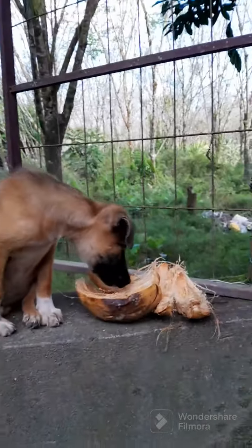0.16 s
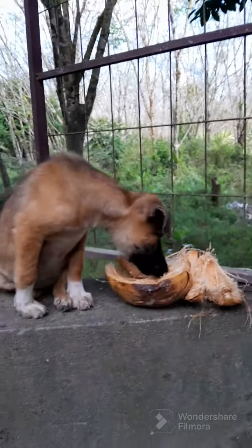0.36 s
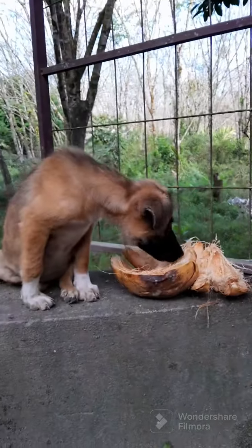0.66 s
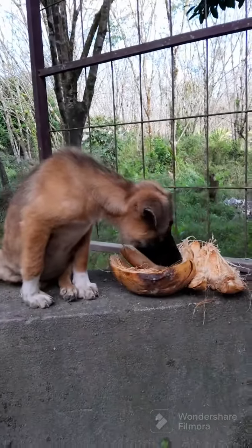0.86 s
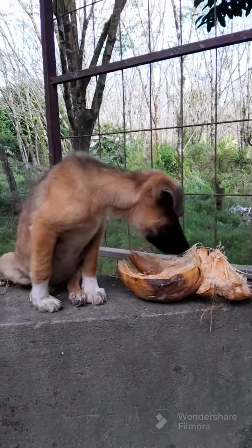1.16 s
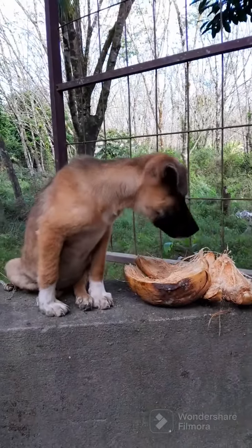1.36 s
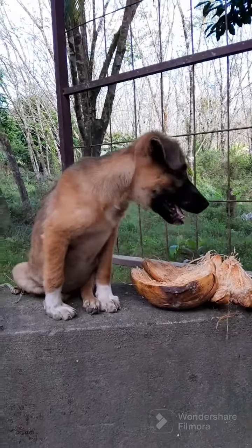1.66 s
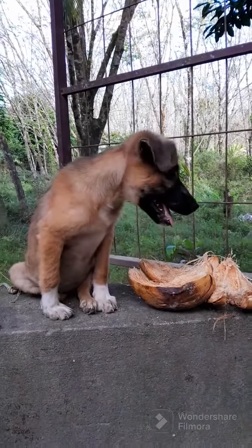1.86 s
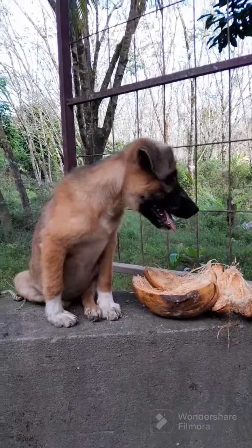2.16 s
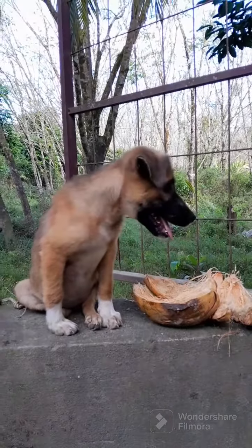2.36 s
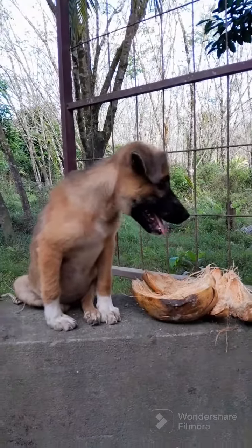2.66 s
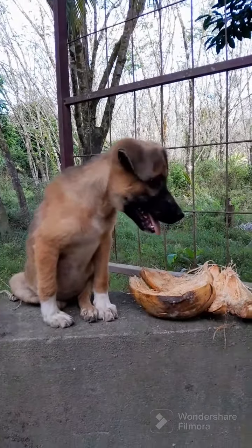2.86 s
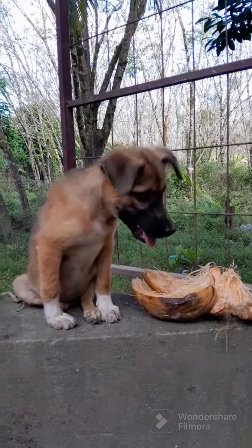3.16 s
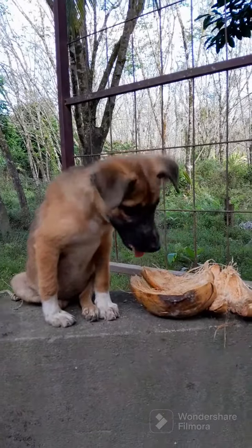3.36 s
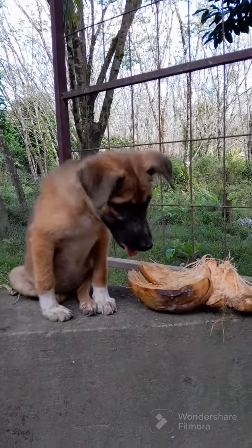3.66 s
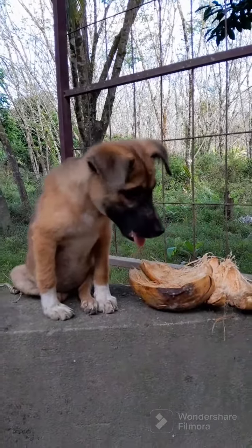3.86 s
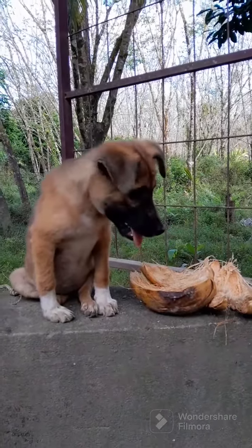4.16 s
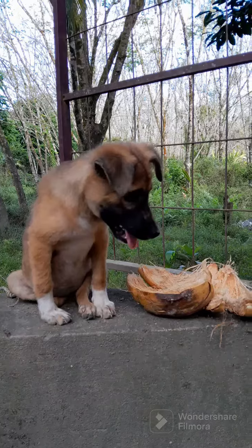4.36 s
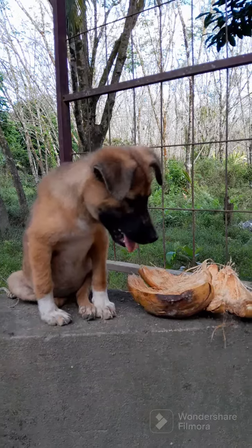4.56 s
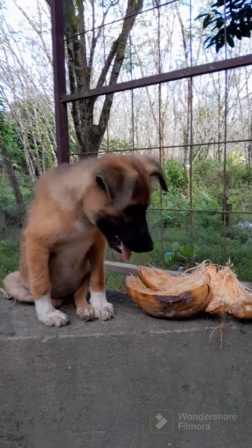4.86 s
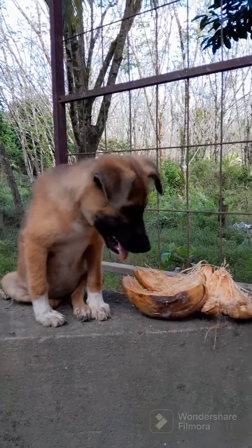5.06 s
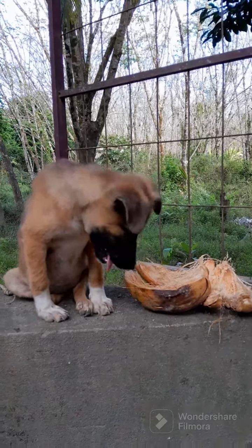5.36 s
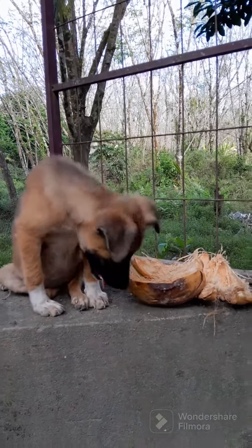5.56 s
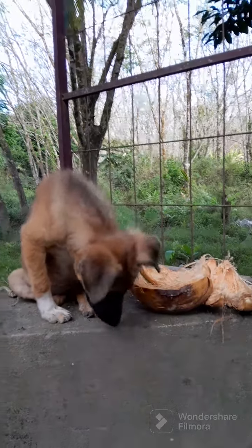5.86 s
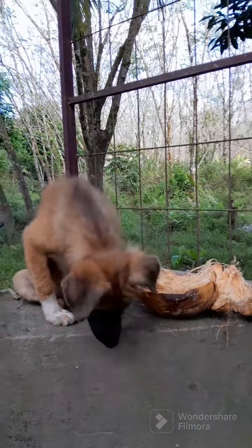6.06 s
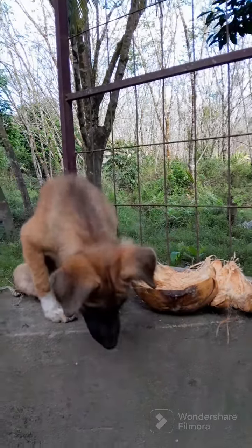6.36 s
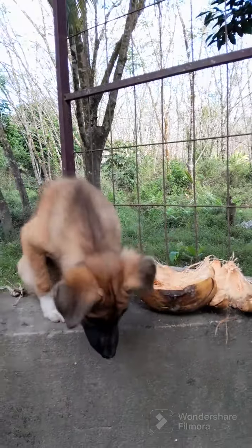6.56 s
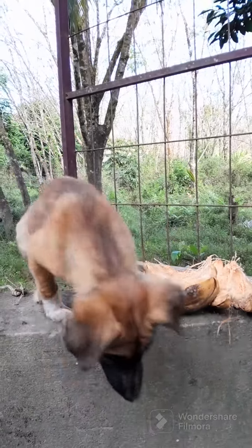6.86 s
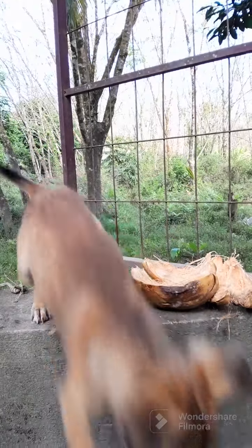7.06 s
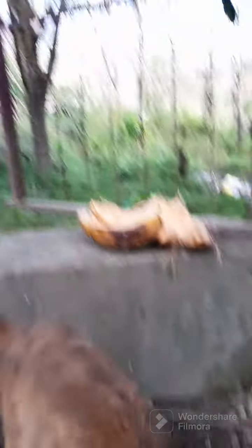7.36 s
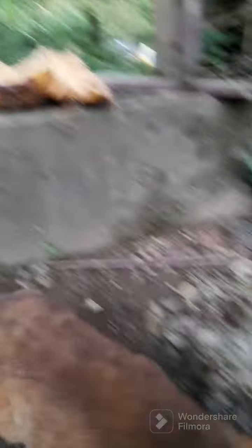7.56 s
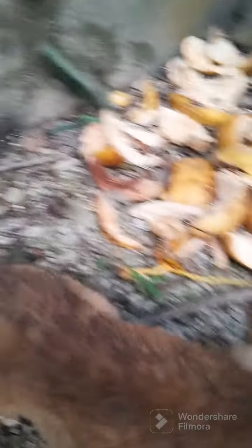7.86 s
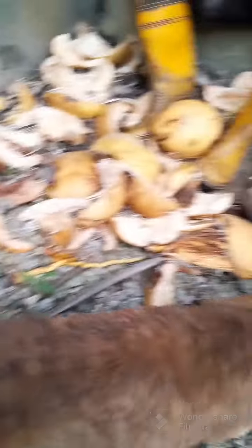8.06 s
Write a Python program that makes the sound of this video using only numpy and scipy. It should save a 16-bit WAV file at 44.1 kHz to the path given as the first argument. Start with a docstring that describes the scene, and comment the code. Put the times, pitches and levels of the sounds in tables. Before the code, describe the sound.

Close, dry contact noises over a quiet open-air bed: thin hiss, faint insects, low rumble and a distant motor hum. Small birds give rising whistles and hoarse chips with a scattered woodland tail. Brushes and knocks rattle the microphone case in separate bursts, with a lull after the middle. At the end a puppy hops down, snapping grit, and rustles past slightly to the right.

```python
"""Puppy and coconut husk at the edge of a wood

A puppy noses a coconut husk on a concrete ledge, then hops down and rustles past over gravel.
Close by, things brush, rub and knock on the hand-held microphone: shaped noise, squeaks and dying low cycles.
Small birds whistle and chip in the trees: gliding tones with rasp and a scattered tail.
Far off an engine hums in a few partials; insects hiss, a whine drifts, and air puffs on the ports."""
import sys
import numpy as np
from scipy import signal
from scipy.fft import rfft, irfft, next_fast_len
from scipy.io import wavfile
from scipy.ndimage import uniform_filter1d

SR = 44100
rng = np.random.default_rng(int(sys.argv[2]) if len(sys.argv) > 2 else 0)


def materialize(psi):
    """Save the field psi as 16-bit PCM at rate SR to the path in sys.argv[1].

    A 1-D psi becomes a single channel; in a 2-D psi each row is a channel.
    """
    bounded = np.clip(np.atleast_2d(psi).T, -1, 1)
    quanta = np.round(bounded * 32767).astype(np.int16)
    wavfile.write(sys.argv[1], SR, quanta)


N = 362061
TIME = np.arange(N) / SR
PASSING_START_S = 7.47  # the puppy lands and starts to pass

# Spectrum of the friction hiss. Each row: frequency in Hz, level in dB per Hz.
HISS_SPECTRUM = [(200, -15), (900, -7), (1600, -5), (2500, -2), (4000, 0), (6000, -2), (8200, 2.5),
                 (11000, -0.5), (15500, -2.5)]
# Spectrum of the far rumble, also used for the rattle of thuds. Each row: frequency in Hz, level in dB per Hz.
RUMBLE_SPECTRUM = [(40, -13.5), (80, 4), (150, -7), (220, -12.5), (350, -15.5), (700, -28.5), (1500, -34),
                   (4000, -37.5)]


def from_db(db):
    """Decibels to gain."""
    return 10 ** (np.asarray(db) / 20)


def rms_one(x):
    """Scale to unit power."""
    return x / np.sqrt(np.mean(x ** 2) + 1e-20)


def in_time(rows, t=TIME):
    """The columns of a curve, joined by straight lines."""
    s, *columns = np.transpose(rows)
    return [np.interp(t, s, c) for c in columns]


def drift(rate, size=N):
    """Random wander of spread about 1, with rate new random points a second joined by lines."""
    steps = np.arange(size) * rate / SR
    return np.interp(steps, np.arange(N // 20), rng.standard_normal(N // 20))


def colour(x, spectrum):
    """Give a noise a smooth spectrum, with nothing below 15 Hz; rms 1."""
    hz, db = np.transpose(spectrum)
    size = next_fast_len(x.shape[-1])
    bins = np.maximum(np.arange(size // 2 + 1) * SR / size, 1)
    gain = from_db(np.interp(np.log(bins), np.log(hz), db)) * (bins > 15)
    shaped = irfft(rfft(x, size) * gain, size)
    return rms_one(shaped[..., :x.shape[-1]])


def resonate(x, hz, width_hz):
    """A two-pole resonance."""
    r = np.exp(-np.pi * width_hz / SR)
    return signal.lfilter([1 - r, 0, r - 1], [1, -2 * r * np.cos(2 * np.pi * hz / SR), r * r], x)


def pair(alike, size=N):
    """White noise at the two ports; alike is the share of power they have in common."""
    alike = np.clip(alike, 0, 1)
    shared = np.sqrt(alike) * rng.standard_normal(size)
    return shared + np.sqrt(1 - alike) * rng.standard_normal((2, size))


def place(x, pan_db, lag_per_db=5.5):
    """The nearer port hears a sound louder and up to 20 samples earlier; positive pan is left."""
    lag = round(float(np.clip(-pan_db * lag_per_db, -20, 20)))
    late = [np.pad(side, (max(d, 0), 0))[:len(side)] for side, d in zip(x, (lag, -lag))]
    return np.array(late) * from_db([[pan_db / 2], [-pan_db / 2]])


def beside(x, s):
    """Place a near contact on the side where things are happening at that time."""
    # Each row: time in seconds, left level over right in dB.
    contact_side = [(1.3, 3), (3.4, -1), (4.3, -1), (6.9, 1.5), (7.3, -3.5), (8.2, -4.5)]
    return place(x, in_time(contact_side, s)[0])


def add(out, s, x):
    """Mix a short sound in at a given time."""
    at = round(s * SR)
    first, last = max(at, 0), min(at + x.shape[-1], N)
    out[:, first:last] += x[:, first - at:last - at]


def friction(size, alike, catch_db, grain_db):
    """Surfaces catch and slip unevenly, and each slip is a shower of tiny grains."""
    uneven_db = catch_db * drift(170, size) + grain_db * drift(1800, size)
    return pair(alike, size) * from_db(uneven_db)


def stroke(s, rise, fall, drone_db, hiss_db, hz, squeak_db, squeak_q=3.3, edge_db=-20, squeak_grip=1.52):
    """A stroke swells and fades: a hiss, the case's drone and a squeak that needs firm pressure."""
    # Spectrum of the case's drone. Each row: frequency in Hz, level in dB per Hz.
    drone_spectrum = [(150, 2.5), (300, -3.5), (420, -10), (590, 1.5), (800, -4), (1050, -4), (1500, -5),
                      (2200, -12), (3400, -11), (6000, -13.5), (16000, -59)]
    t = np.arange(-SR // 2, SR // 2) / SR
    # edge_db is reached one rise before and one fall after the loudest moment
    pressure = from_db(edge_db * np.where(t < 0, (t / rise) ** 2, np.abs(t / fall)))
    case_slips = friction(len(t), alike=0.61, catch_db=3.5, grain_db=0.0)
    drone = from_db(drone_db) * colour(case_slips, drone_spectrum)
    hiss_slips = friction(len(t), alike=0.23, catch_db=3.0, grain_db=2.3)
    hiss = from_db(hiss_db) * colour(hiss_slips, HISS_SPECTRUM)
    squeak_slips = friction(len(t), alike=0.68, catch_db=3.0, grain_db=0.5)
    width = hz / squeak_q
    squeak = from_db(squeak_db) * rms_one(resonate(resonate(squeak_slips, hz, width), hz, width))
    return beside(pressure * (drone + hiss) + pressure ** squeak_grip * squeak, s)


def brushes(squeak_hz=2180, squeak_db=-15, drone_db=-13.5):
    """Light brushes of fur and fibre mostly hiss; squeak and drone are set relative to that hiss."""
    # Each row: loudest moment, rise and fall in seconds, hiss level in dB.
    light_touches = [(.785, 0.014, 0.21, -44), (.826, 0.0083, 0.12, -43.5), (1.015, 0.0076, 0.073, -56.5),
                     (1.168, 0.0074, 0.036, -54), (1.197, 0.04, 0.13, -45), (1.283, 0.0045, 0.078, -48),
                     (6.935, 0.006, 0.14, -54), (7.252, 0.026, 0.025, -43.5), (7.39, 0.053, 0.14, -66)]
    out = np.zeros((2, N))
    for s, rise, fall, db in light_touches:
        touch = stroke(s, rise, fall, db + drone_db, db, squeak_hz, db + squeak_db)
        add(out, s - .5, touch)
    return out


def rubs():
    """A firm rub makes the microphone case drone and squeak."""
    # Each row: loudest moment, rise and fall in seconds, drone and hiss levels in dB,
    # squeak pitch in Hz, squeak level in dB.
    firm_touches = [ (.832, 0.0076, 0.0084, -39, -55, 2570, -42.5),
                    (.850, 0.036, 0.083, -48, -55, 2080, -49.5), (.9, 0.048, 0.21, -64.5, -56, 2170, -64),
                    (2.785, 0.048, 0.12, -67, -67.5, 740, -71), (3.27, 0.21, .24, -69, -63.5, 2480, -80),
                    (3.386, 0.04, 0.12, -47.5, -51, 2440, -43),
                    (3.409, 0.028, 0.027, -46, -46, 1830, -43.5),
                    (3.488, 0.047, 0.12, -58, -62.5, 2320, -55),
                    (4.0215, 0.0021, 0.049, -44, -58, 1310, -41.5),
                    (4.037, .012, .046, -36, -47, 1410, -37), (4.084, 0.0044, 0.033, -40.5, -65, 990, -44),
                    (4.099, .0044, 0.083, -50, -56, 1460, -51.5),
                    (4.257, 0.023, 0.048, -54.5, -59, 710, -52),
                    (4.274, 0.0068, .06, -47.5, -59, 1400, -48), (4.314, 0.029, .12, -52, -56, 635, -54.5),
                    (6.134, .004, 0.029, -67.5, -80, 1366, -70), (6.52, .13, 0.35, -60.5, -61.5, 1020, -70),
                    (6.752, .004, 0.076, -54.5, -63, 1250, -58.5),
                    (6.791, .004, 0.12, -57.5, -69, 1220, -58), (7.303, 0.031, 0.035, -40, -47, 1460, -42),
                    (7.31, 0.015, 0.043, -42.5, -57, 580, -39)]
    out = np.zeros((2, N))
    for s, *shape in firm_touches:
        add(out, s - .5, stroke(s, *shape))
    return out


def steps(ring_hz=2700, ring_db=-12, drone_db=-21):
    """Paws land and skid on gravel, which hisses and rings; ring and drone are relative to the hiss."""
    # Each row: loudest moment, rise and fall in seconds, hiss level in dB.
    paws = [(7.470, 0.0049, 0.06, -31), (7.496, 0.022, 0.016, -34.5), (7.551, .006, 0.063, -45.5),
            (7.658, 0.03, 0.073, -40), (7.778, 0.0068, 0.027, -32.5), (7.924, 0.012, .04, -47.5),
            (8.044, 0.0057, 0.055, -53.5), (8.196, 0.012, 0.033, -44.5)]
    out = np.zeros((2, N))
    for s, rise, fall, db in paws:
        add(out, s - .5, stroke(s, rise, fall, db + drone_db, db, ring_hz, db + ring_db))
    return out


def passing(start_db=-57.5, growth_db_per_s=8, attack_s=.02, crunch_db=-6, crunch_db_per_s=6,
            crunches_per_s=900, ring_q=8, size_db=0.5, uneven_db=3.0, clump_db=4.5, clumps_per_s=28):
    """Grainy rustle grows as the puppy nears; small stones knock in clumps, each at its own pitch."""
    # Spectrum of the rustle. Each row: frequency in Hz, level in dB per Hz.
    rustle_spectrum = [(100, -3), (200, 6), (400, 1.5), (650, -7.5), (1000, -9), (1400, -5), (2500, -6),
                       (5000, -5), (9000, -9.5), (15500, -11.5)]
    t = np.arange(N - round(PASSING_START_S * SR)) / SR
    level_db = start_db + growth_db_per_s * t + uneven_db * drift(28.1, len(t))
    level = from_db(level_db) * np.minimum(t / attack_s, 1)
    grains = colour(friction(len(t), alike=0.15, catch_db=3.0, grain_db=2.0), rustle_spectrum)
    pitches = np.geomspace(620, 2400, num=14)
    clumps = clump_db * drift(clumps_per_s, len(t))
    stones = 0
    for hz in pitches:
        hits = rng.random(len(t)) < crunches_per_s / len(pitches) / SR
        strikes = hits * from_db(clumps + size_db * drift(59.8, len(t)))
        stones = stones + resonate(strikes * pair(0.51, len(t)) + 1e-18, hz, hz / ring_q) / hz
    crunch = from_db(crunch_db + crunch_db_per_s * t) * rms_one(stones)  # relative to the grains
    out = np.zeros((2, N))
    add(out, PASSING_START_S, place((grains + crunch) * level, pan_db=-4.0))
    return out


def ticks(t60=0.009, crest_db=-6, grit_per_s=14, grit_db=-34.5, grit_spread_db=1.5):
    """Grit and dry fibres snap in a few milliseconds; the running puppy kicks up more at random."""
    # The sharpest ticks. Each row: time in seconds, nominal peak level in dB.
    sharp_ticks = [(.823, -25.5), (1.013, -44), (1.17, -46), (1.282, -43), (4.033, -30), (4.061, -42),
                   (4.273, -40), (6.934, -33.5), (7.228, -41), (7.468, -16), (7.55, -29.5), (7.586, -32),
                   (7.639, -32), (7.722, -28.5), (7.777, -27), (7.978, -34), (8.042, -30), (8.057, -29)]
    out, t = np.zeros((2, N)), np.arange(SR // 20) / SR
    kicked = TIME[(rng.random(N) < grit_per_s / SR) & (TIME > PASSING_START_S)]
    grit = [(s, grit_db + grit_spread_db * rng.standard_normal()) for s in kicked]
    for s, db in list(sharp_ticks) + grit:
        fade = from_db(db + crest_db - 60 * t / t60)  # crest_db: from peak to rms
        add(out, s - .0005, beside(colour(pair(0.66, len(t)), HISS_SPECTRUM) * fade, s))
    return out


def thud(hz, db, t60, rattle_db, attack_s=0.0014):
    """A few dying low cycles with a little rattle."""
    t = np.arange(SR // 3) / SR
    rattle = from_db(rattle_db) * colour(pair(0.97, len(t)), RUMBLE_SPECTRUM)
    swing = np.sin(2 * np.pi * hz * t) + rattle
    return swing * from_db(db - 60 * t / t60) * (1 - np.exp(-t / attack_s))


def knocks():
    """Soft knocks set the microphone case swinging."""
    # Each row: time in seconds, pitch in Hz, level in dB before the attack, 60 dB decay time in seconds.
    case_knocks = [(0.829, 214, -16.5, 0.015), (4.039, 71.8, -18, 0.18), (4.041, 135.8, -21.5, 0.073),
                   (4.082, 176, -27.5, 0.059), (4.272, 72.5, -39.5, 0.51), (6.748, 169, -29.5, 0.056),
                   (7.247, 140, -38.5, 0.1), (7.28, 187, -42.5, .11), (7.497, 129, -34, 0.051)]
    out = np.zeros((2, N))
    for s, hz, db, t60 in case_knocks:
        add(out, s, beside(thud(hz, db, t60, rattle_db=-15.5), s))
    return out


def tone(hz, overtone_db):
    """A near-sine with weak second and third partials."""
    phase = 2 * np.pi * np.cumsum(hz) / SR
    partials = sum(np.sin(k * phase) * (k * hz < SR / 2) for k in range(2, 4))
    return np.sin(phase) + from_db(overtone_db) * partials


def through_trees(note, wet_db, t60=0.36):
    """The trunks scatter a note into a tail, wet_db against direct sound; its loudest part has rms 1."""
    t = np.arange(SR // 2) / SR
    trunks = pair(0.17, len(t)) * from_db(-60 * t / t60)
    trunks *= from_db(wet_db) / np.sqrt(np.sum(trunks[0] ** 2))
    trunks[:, 0] += 1  # direct sound
    heard = signal.fftconvolve(note[None], trunks, axes=1)
    power = uniform_filter1d(heard ** 2, size=1800, axis=1)
    return heard / np.sqrt(power.max(axis=1, keepdims=True))


def whistles(scoop=.29, rise_s=.06, hold_s=0.078, swell_db_per_s=280, release_db_per_s=1702, waver=0.01,
             overtone_db=-28, attack_s=0.013, rasp_lead_s=0.011, rasp_edge_db_per_s=1100, wet_db=-1):
    """A hoarse start, then the whistle scoops up, swells as it levels out and stops short."""
    # Rising whistles. Each row: start in seconds, top pitch in Hz, level in dB, rasp in dB against the note.
    calls = [(-.065, 4513, -45.5, -20.5), (1.370, 4737, -54, -21), (4.565, 4943, -38.5, -24),
             (6.786, 4620, -67, -22)]
    # Spectrum of the rasp. Each row: frequency in Hz, level in dB per Hz.
    rasp_spectrum = [(2500, -12), (3800, -5), (4800, 6.5), (6500, -6), (9500, -3.5), (11000, -18),
                     (15500, -11)]
    out, t = np.zeros((2, N)), np.arange(-SR // 30, SR // 8) / SR
    late = np.maximum(t - hold_s, 0)
    swell_db = -swell_db_per_s * np.maximum(hold_s - t, 0) - release_db_per_s * late
    swell = np.clip(t / attack_s, 0, 1) * from_db(swell_db)
    hoarse_db = -rasp_edge_db_per_s * (late + np.maximum(-t - rasp_lead_s, 0))
    share = 1 - scoop * np.clip(1 - t / rise_s, 0, 1) ** 2  # of the top pitch
    for s, top_hz, db, rasp_db in calls:
        note = swell * tone(top_hz * share * (1 + waver * drift(588, len(t))), overtone_db)
        note += from_db(rasp_db + hoarse_db) * colour(rng.standard_normal(len(t)), rasp_spectrum)
        add(out, s + t[0], from_db(db) * place(through_trees(note, wet_db), pan_db=8, lag_per_db=1.0))
    return out


def chips(length_s=.05, sag=.11, waver=0.024, flick=0.15, flick_curve=4.86, rasp_db=-12, wet_db=8):
    """Hoarse chips sag in pitch and end in a quick downward flick."""
    # Each row: start in seconds, first pitch in Hz, level in dB.
    calls = [(0.522, 5790, -66), (.684, 5650, -62), (1.606, 6190, -61.5), (1.67, 5950, -66),
             (2.337, 6050, -65.5), (2.779, 6380, -58.5), (2.925, 6500, -57.5), (3.063, 6420, -55),
             (3.20, 6400, -55.5), (3.336, 6400, -56), (3.472, 6450, -53.5), (3.573, 6095, -57),
             (3.63, 6600, -57), (3.776, 6440, -61), (3.94, 6380, -61), (6.021, 5650, -71.5),
             (6.255, 5620, -69)]
    # Spectrum of the rasp. Each row: frequency in Hz, level in dB per Hz.
    rasp_spectrum = [(3200, -38), (4400, -13.5), (5300, -4), (6200, -12.5), (7000, -15), (9000, -19),
                     (15000, -33)]
    out, along = np.zeros((2, N)), np.linspace(0, 1, int(length_s * SR))
    for s, first_hz, db in calls:
        bend = 1 - flick * along ** flick_curve + waver * drift(1104, len(along))
        hz = first_hz * (1 - sag * along) * bend
        rasp = from_db(rasp_db) * colour(rng.standard_normal(len(along)), rasp_spectrum)
        note = np.sin(np.pi * along) * (tone(hz, overtone_db=-27) + rasp)
        add(out, s, from_db(db) * place(through_trees(note, wet_db), pan_db=5.0, lag_per_db=1.0))
    return out


def far_notes():
    """Other birds add faint lone notes from further off, each a straight glide."""
    # Each row: start in seconds, first and last pitch in Hz, length in seconds, level in dB.
    lone_notes = [(4.674, 484, 910, 0.044, -67), (6.936, 9000, 8850, 0.031, -71.5),
                  (7.16, 925, 1040, 0.045, -67.5)]
    out = np.zeros((2, N))
    for s, first_hz, last_hz, length, db in lone_notes:
        hz = np.linspace(first_hz, last_hz, int(length * SR))
        note = np.hanning(len(hz)) * tone(hz, overtone_db=-25)
        add(out, s, from_db(db) * through_trees(note, wet_db=-5))
    return out


def engine(unsteady_db=2.0, wobble=0.003):
    """Only the firing note, at twice the cycle rate, and a few overtones carry this far."""
    # Each row: time in seconds, cycle rate in Hz.
    speed = [(0, 38.48), (.3, 43.56), (.75, 50.8), (1.55, 59.35), (2.0, 60.15), (2.85, 54.72), (4.3, 54.16),
             (4.9, 53.8), (6.3, 56.46), (7.6, 60.2), (8.2, 61.3)]
    # Each row: time in seconds, firing note level in dB, base level of the overtones in dB.
    loudness = [(0, -52, -69.5), (.8, -50.5, -64), (2.3, -71, -75.5), (2.9, -58.5, -71),
                (4.35, -56.5, -76.5), (4.8, -69.5, -79.5), (5.4, -65, -75), (7.2, -69.5, -72),
                (8.0, -66, -60)]
    # Each row: multiple of the cycle rate, level in dB against the overtones' base level.
    orders = [(3, -1), (4, -9), (5, -11.5), (6, -15.5)]
    (hz,), (firing_db, overtones_db) = in_time(speed), in_time(loudness)
    phase = 2 * np.pi * np.cumsum(hz * (1 + wobble * drift(15))) / SR
    out = from_db(firing_db + unsteady_db * drift(9)) * np.sin(2 * phase)
    for multiple, db in orders:
        level = from_db(overtones_db + db + unsteady_db * drift(8.1))
        out = out + level * np.sin(round(multiple) * phase)
    return np.sqrt(2) * out  # levels are rms


def puffs(hz=63.8, t60=0.16, pan_db=21):
    """Puffs of air thud, almost wholly on the left port."""
    # Each row: time in seconds, level in dB before attack and panning.
    air_puffs = [(0.036, -39), (.15, -38.5), (.27, -41.5), (1.267, -37), (1.497, -35)]
    out = np.zeros((2, N))
    for s, db in air_puffs:
        add(out, s, place(thud(hz, db, t60, rattle_db=-18.5, attack_s=0.0032), pan_db))
    return out


def breeze(trim_db=-2):
    """Air buffets the ports as low noise that dies down, with brief gusts on top."""
    # Each row: time in seconds, level in dB before the trim.
    strength = [(0, -49.5), (.6, -57), (1.0, -51.5), (1.55, -54), (1.9, -66), (3.0, -59.5), (4.3, -62.5),
                (4.8, -65.5), (8.21, -64.5)]
    # Each row: middle in seconds, length in seconds, lift in dB.
    gusts = [(2.42, .09, 5.5), (3.627, 0.12, 7), (6.143, .04, 11.5), (6.52, 0.064, 8), (8.2, 0.087, 11)]
    # Spectrum of the buffeting. Each row: frequency in Hz, level in dB per Hz.
    buffet_spectrum = [(16, -53), (28, -15), (42, -4.5), (62, 0.5), (85, -7), (130, -17.5), (300, -27.5),
                       (800, -50)]
    (air_db,) = in_time(strength)
    for s, length, db in gusts:
        air_db = air_db + db * np.exp(-((TIME - s) / length) ** 2)
    return from_db(air_db + trim_db) * place(colour(pair(0.76), buffet_spectrum), pan_db=9.5, lag_per_db=1.5)


def rumble(trim_db=-2):
    """Far rumble: low noise, much alike at both ports."""
    # Each row: time in seconds, level in dB before the trim.
    far_level = [(0, -64.5), (1.2, -61), (2.3, -72.5), (3.3, -59.5), (4.4, -58), (4.8, -65.5), (6.1, -70),
                 (6.5, -58.5), (8.21, -63.5)]
    (far_db,) = in_time(far_level)
    return from_db(far_db + trim_db) * colour(pair(0.84), RUMBLE_SPECTRUM)


def insects():
    """Thin bands of resonant noise that waver slightly in level."""
    # Each row: centre in Hz, width of each of two resonances in Hz, level in dB.
    bands = [(7090, 260, -86.5), (10530, 850, -79.5)]
    out = np.zeros((2, N))
    for hz, width, db in bands:
        band = rms_one(resonate(resonate(pair(0.19), hz, width), hz, width))
        out += from_db(db) * band * from_db(1.9 * drift(4))
    return out


def whine():
    """A far whine: one sine whose pitch jitters."""
    # Each row: time in seconds, mean pitch in Hz, peak level in dB.
    course = [(4.2, 1227, -100), (4.9, 1252, -84), (5.6, 1302, -90), (6.3, 1378, -81), (7.1, 1393, -80.5),
              (7.6, 1394, -77)]
    hz, db = in_time(course)
    return from_db(db) * np.sin(2 * np.pi * np.cumsum(hz * (1 + 0.0423 * drift(200))) / SR)


def outdoor_hiss(db=-72):
    """Even outdoor hiss: steady noise, almost unrelated at the two ports."""
    # Each row: frequency in Hz, level in dB per Hz.
    quiet_spectrum = [(250, -0.5), (500, 0.5), (800, 0.5), (1100, -2.5), (1800, -7), (3200, -10),
                      (5000, -10), (6700, -16.5), (7200, -3), (9200, -3), (9600, -10), (11300, -15),
                      (11900, -17), (15500, -9)]
    return from_db(db) * colour(pair(0.069), quiet_spectrum)


def scene():
    """Near contacts over the birds and the open air."""
    near = brushes() + rubs() + steps() + passing() + ticks() + knocks()
    birds = whistles() + chips() + far_notes()
    open_air = engine() + puffs() + breeze() + rumble() + insects() + whine() + outdoor_hiss()
    return near + birds + open_air


def record(dry, low_cut_hz=34, top_cut_hz=15850):
    """The small microphone loses the deepest bass; the top is cut steeply."""
    thin = signal.sosfilt(signal.butter(3, low_cut_hz, "high", fs=SR, output="sos"), dry)
    return signal.sosfilt(signal.ellip(12, .2, 80, top_cut_hz, fs=SR, output="sos"), thin)


dry = scene()
out = record(dry)
materialize(out)
```